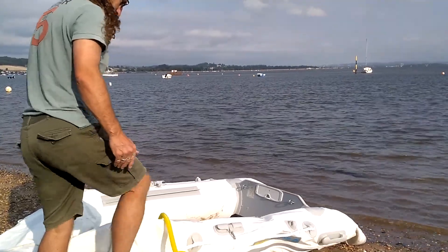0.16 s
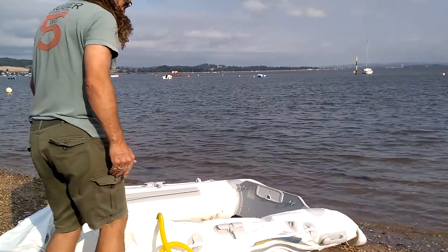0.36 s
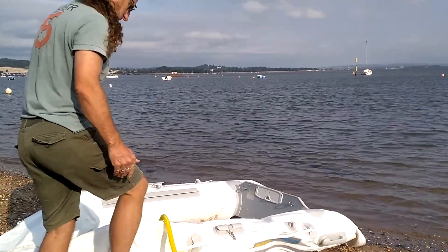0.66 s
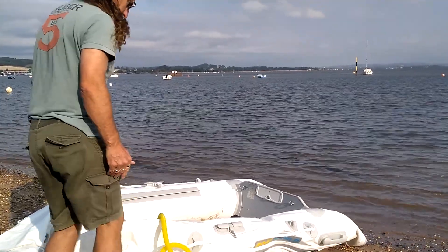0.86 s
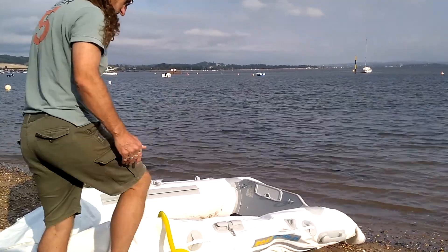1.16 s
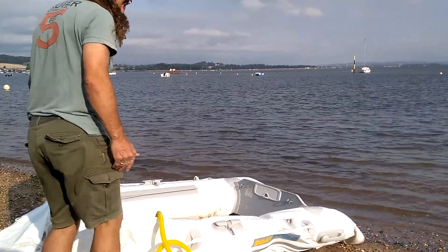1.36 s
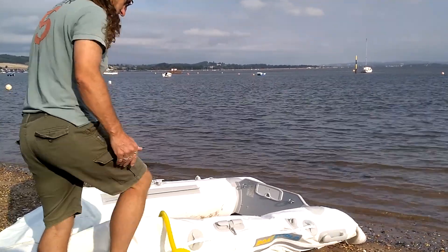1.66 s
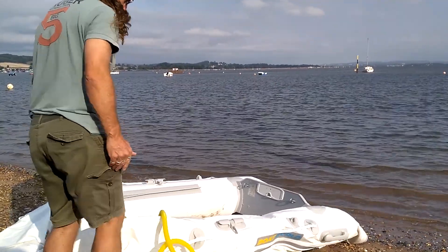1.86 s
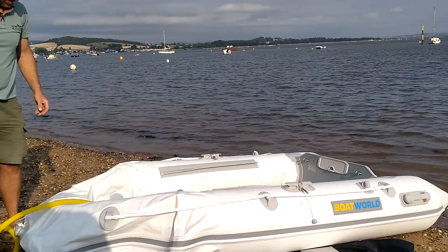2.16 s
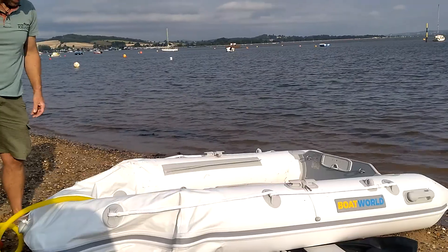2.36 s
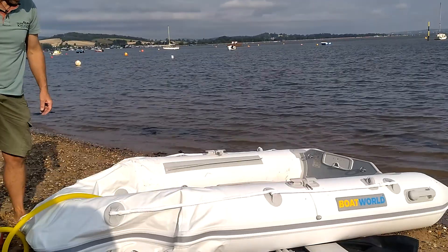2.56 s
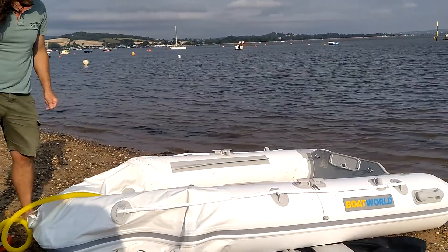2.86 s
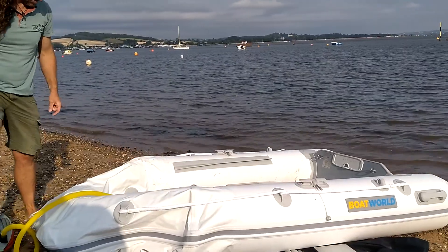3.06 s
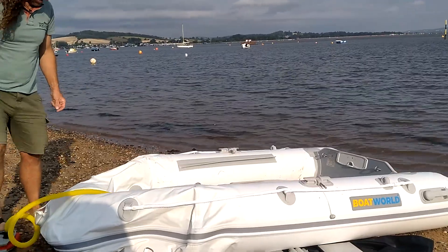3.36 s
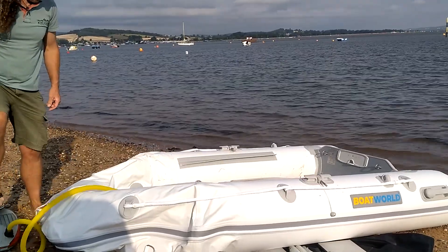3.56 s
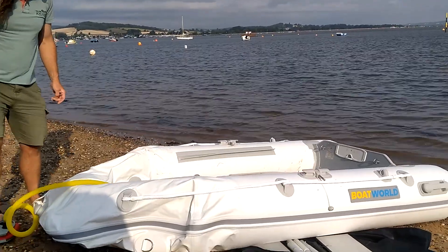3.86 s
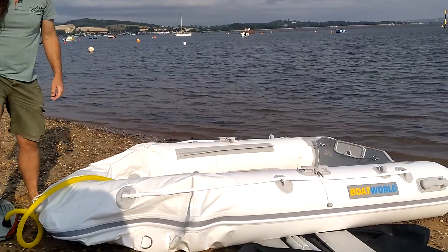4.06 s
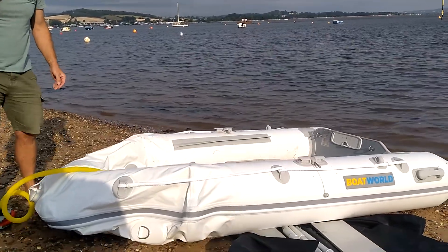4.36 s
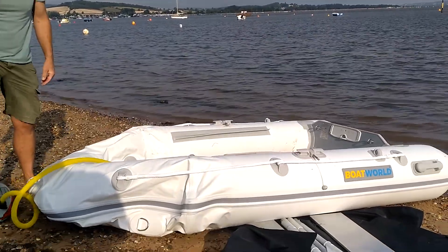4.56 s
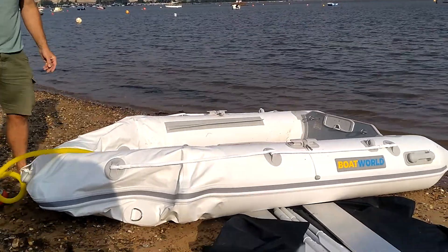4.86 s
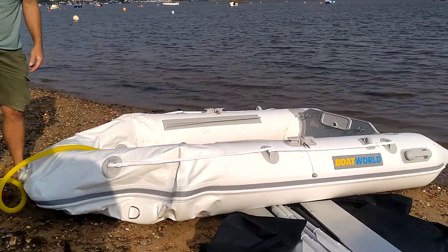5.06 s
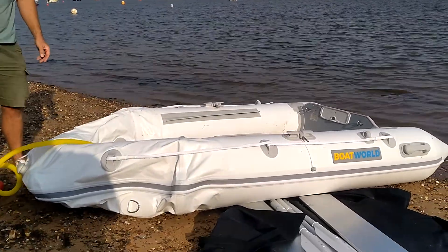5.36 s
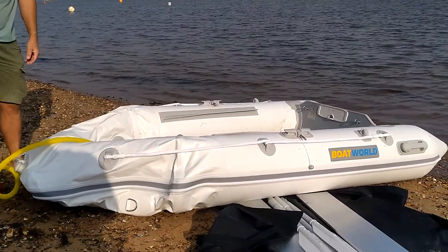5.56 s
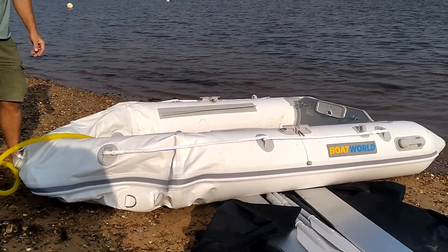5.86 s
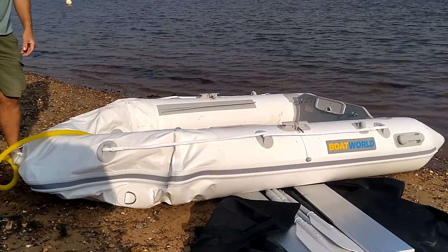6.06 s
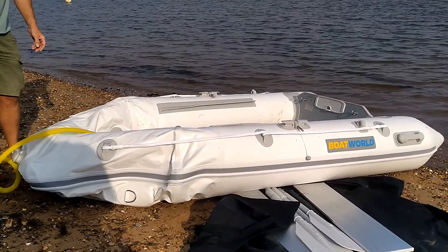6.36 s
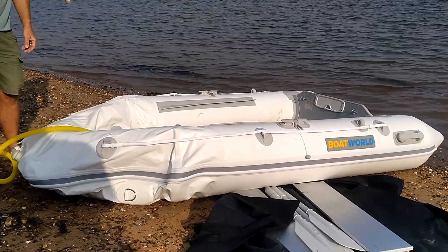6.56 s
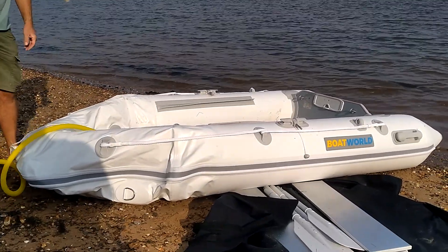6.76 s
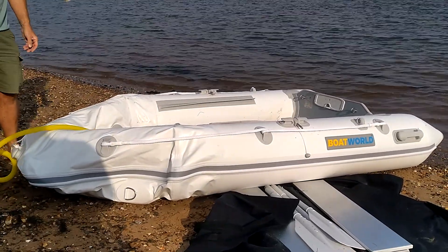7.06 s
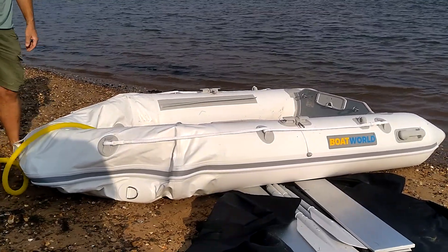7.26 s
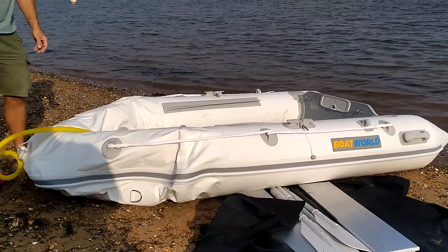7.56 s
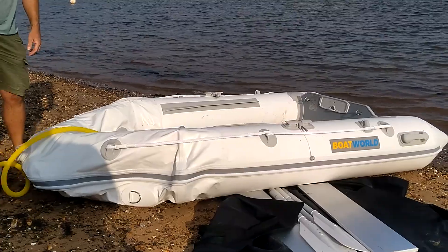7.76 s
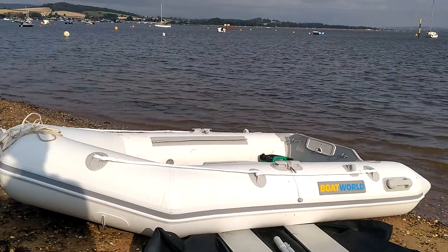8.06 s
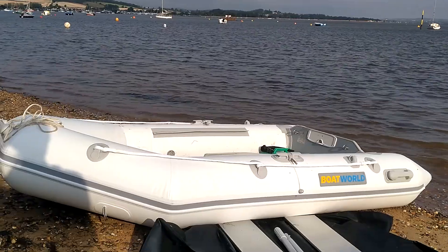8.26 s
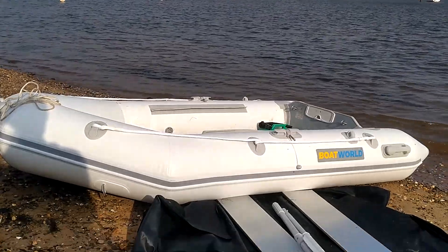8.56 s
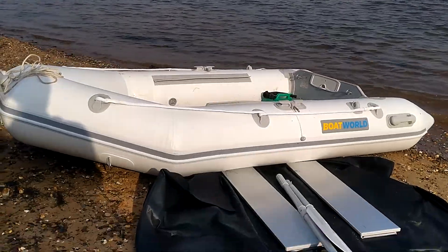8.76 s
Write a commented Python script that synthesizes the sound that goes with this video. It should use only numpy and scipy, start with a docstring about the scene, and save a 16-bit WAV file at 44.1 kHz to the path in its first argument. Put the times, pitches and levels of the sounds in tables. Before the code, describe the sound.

Outdoors on shingle, a foot pump works at two strokes a second: valve tick, rush of air, sliding squeaky whistle, soft refill. Wind buffets the stereo microphone heavily. After two seconds comes a short silence, then closer, brighter pumping with less buffeting. Another silence leads to quiet wind, soft waves, crunching pebbles and a small drip.

```python
"""A shingle beach, heard from three places in turn with silence between: at the first two a bellows foot pump
fills an inflatable boat, at the third only wind, small waves, crunching pebbles and a drip are heard.
Each stroke: the valve flaps tick (short noise and a thump), air hisses down a ribbed hose (echoing noise),
the hose whistles as the flow slows (sliding narrow noise and swelling sines), the bellows refill (duller noise).
Wind buffets both microphone ports (low noise in lumps and bursts); waves wash softly behind (patchy noise)."""
import sys
import numpy as np
from scipy import signal
from scipy.fft import rfft, irfft
from scipy.io import wavfile
from scipy.ndimage import uniform_filter1d

SR = 44100
rng = np.random.default_rng(int(sys.argv[2]) if len(sys.argv) > 2 else 0)


def put_to_file(sound):
    """Save the sound as 16-bit audio at rate SR, in the file named by the first command-line argument."""
    columns = np.atleast_2d(sound).T  # one column per channel
    safe = np.clip(columns, -1, 1)
    whole_steps = np.round(safe * 32767)
    wavfile.write(sys.argv[1], SR, whole_steps.astype(np.int16))


def undo_db(level):
    """Turn decibels back into plain size, where 20 dB means ten times bigger."""
    steps = np.asarray(level, float) / 20
    return 10 ** steps


N = 393606

# the three listening places: cut in t/s, fade-in length/s, cut out t/s
PLACES = [(-1, .01, 2.127), (2.468, .2, 7.847), (8.19, .2, 9)]
# pump strokes: foot down t/s, push hiss level/dB, refill hiss level/dB, first valve flap before t/s, flap click level/dB
STROKES = [(-.335, -33, -44, .013, -36), (.1795, -33, -44, .0135, -35), (.6754, -34, -44, .016, -38),
           (1.1837, -34.5, -45, .0135, -39), (1.689, -33.5, -44, .013, -40),
           (2.5975, -30.5, -42, .009, -31), (3.1218, -30.5, -43, .0105, -30),
           (3.6436, -30.5, -43, .0115, -24), (4.154, -30, -42, .013, -30), (4.685, -30, -43, .011, -24),
           (5.213, -30, -42, .012, -26), (5.7374, -30, -42, .018, -27), (6.272, -29.5, -42, .0135, -25),
           (6.8014, -29, -43, .012, -30), (7.336, -29.5, -48, .01, -28)]
PUSH_S = .306   # nominal length of a push
HOSE_SPACING_HZ = 101.8   # spacing of the hose modes


def rms_one(x):
    """Scales a signal to an rms of 1."""
    return x / np.sqrt(np.mean(x ** 2) + 1e-20)


def in_time(rows):
    """The columns of a table, read at every sample."""
    s, *columns = np.transpose(rows)
    return [np.interp(np.arange(N) / SR, s, c) for c in columns]


def at_hz(points, column=1):
    """A table read at every FFT bin on a log-frequency axis."""
    hz = np.fft.rfftfreq(N, 1 / SR) + 1
    points = np.array(points)
    return np.interp(np.log(hz), np.log(points[:, 0]), points[:, column])


def coloured(spectrum, channels):
    """The FFT of independent noises shaped to a spectrum."""
    return rfft(rng.standard_normal((channels, N))) * undo_db(at_hz(spectrum))


def drift(rate, channels=1):
    """Slow chance through a double one-pole low-pass at rate Hz, made at SR / 8; spread 1."""
    r = np.exp(-16 * np.pi * rate / SR)
    chance = rng.standard_normal((channels, N // 8 + 4001))
    slow = signal.lfilter([1], [1, -2 * r, r * r], chance)[:, 4000:]
    return np.repeat(rms_one(slow), 8, axis=1)[:, :N]


def ring(clicks, hz, t60):
    """A two-pole resonance struck by clicks, falling 60 dB in t60 seconds."""
    r, w = undo_db(-60 / (t60 * SR)), 2 * np.pi * hz / SR
    return signal.lfilter([0, np.sin(w)], [1, -2 * r * np.cos(w), r * r], clicks + 1e-18)


def dying_bursts(when, db, t60):
    """An envelope that jumps up at each time and falls 60 dB in t60 seconds."""
    starts = np.zeros(N)
    starts[(np.asarray(when) * SR).astype(int)] = undo_db(db)
    return signal.lfilter([1], [1, -undo_db(-60 / (t60 * SR))], starts + 1e-18)


def panned(db, pan_db):
    """Gains of the left and right port, pan_db apart."""
    return undo_db(db + pan_db * np.array([[.5], [-.5]]))


def wind():
    """Each port has its own eddies: a lumpy rumble, and buffets in bursts that get brighter as they get stronger."""
    # wind at the ports: t/s, rumble level/dB, buffet level/dB, buffet left-right level/dB
    wind_levels = [(0, -15.5, -22.5, 6), (1.25, -13.5, -20, 6), (1.75, -15.5, -23.5, 5),
                   (2.12, -15, -17.5, 4), (2.6, -19.5, -35.6, 8), (3.05, -27.5, -42.6, 1),
                   (3.3, -23.5, -43, -1), (3.8, -23.5, -40.6, -2), (4.6, -20, -39, -5), (5.1, -12, -30, -4),
                   (5.7, -14.5, -31, -7), (6.15, -21.5, -40.6, -3), (6.7, -14.5, -36.6, -4),
                   (7.15, -14.5, -30.6, -4), (7.45, -19.5, -40.6, -5), (7.7, -10, -34.6, -9),
                   (8.3, -32, -55.6, -2), (8.65, -20.5, -49.6, -14), (8.92, -31.5, -56.6, -6)]
    # colour of the rumble: f/Hz, level per Hz/dB
    rumble_colour = [(8, -20), (18, -1), (45, 0), (110, -8), (200, -15), (370, -31), (700, -50),
                     (1400, -75)]
    # colour of the buffets: f/Hz, level per Hz/dB
    buffet_colour = [(100, -8), (230, 0), (450, -8), (800, -23), (1600, -46), (3000, -70)]
    rumble_lean = .6   # share of the buffets' left-right lean that the rumble follows
    rumble_db, buffet_db, buffet_pan = in_time(wind_levels)
    lumps = 4.0 * drift(9, channels=2)
    rumble = rms_one(irfft(coloured(rumble_colour, channels=2), N) * undo_db(lumps))

    buffet = irfft(coloured(buffet_colour, channels=2), N)
    bursts = .8 * lumps + 4.0 * drift(18, channels=2) + 4.5 * drift(70, channels=2)
    buffet = rms_one(buffet * undo_db(bursts))
    dull = signal.sosfiltfilt(signal.butter(2, 380, fs=SR, output="sos"), buffet)
    # the part above 380 Hz grows faster than the level, most at the stronger port
    edge = undo_db(.35 * (buffet_db + 22.6) + buffet_pan * np.array([[.6], [-.6]]))
    buffet = dull + edge * (buffet - dull)
    return panned(rumble_db, rumble_lean * buffet_pan) * rumble + panned(buffet_db, buffet_pan) * buffet


def shore():
    """Small waves wash in grainy patches; pebbles crunch in short bright bursts; a drop plops."""
    # colour of the wash: f/Hz, level per Hz/dB
    wash_colour = [(300, -24), (650, -4), (1300, -6), (2400, 0), (4500, -10), (6000, -18), (9000, -22),
                   (15400, -58)]
    # shingle shifting: t/s, burst level before the band-pass/dB
    crunches = [(8.2482, -57), (8.3, -57), (8.4944, -56), (8.5944, -52), (8.6981, -36), (8.7114, -45),
                (8.8338, -49)]
    wash_db = -52.3   # before the patches
    drip_s, drip_hz, drip_db = 8.885, 690, -45
    patches = 1.5 * drift(5, channels=2) + 1.8 * drift(70, channels=2)
    wash = undo_db(wash_db + patches) * rms_one(irfft(coloured(wash_colour, channels=2), N))

    s, db = np.transpose(crunches)
    band = signal.butter(2, [2800, 9500], "band", fs=SR, output="sos")
    grit = signal.sosfilt(band, rng.standard_normal((2, N)))
    crunch = dying_bursts(s, db, t60=.045) * grit

    drop = undo_db(drip_db) * (np.arange(N) == round(drip_s * SR))
    return wash + crunch + ring(drop, drip_hz, t60=.07)


def hiss(spectrum):
    """Jet noise echoing in the hose, part of it common to both ports, coloured by the place."""
    # colour of the pump at each port, one table for the first place and one for the second:
    # f/Hz, left level/dB, right level/dB
    port_colours = [
        [(1200, -3, -4), (1700, -7, -5), (2700, -11, -5), (4300, -3, 3), (6000, -6, -5), (7200, 2, 0),
         (12000, -2, -2)],
        [(1100, -3, -4), (1600, -6, -8), (2400, 1, -2), (3400, 3, 2), (5000, -3, -2), (6100, -4, 2),
         (7700, 4, -4), (9500, -8, 4), (14000, -8, -1)],
    ]
    # the left port hears the pump later, directly and off the shingle, a row for each place:
    # direct lag t/ms, bounce lag t/ms, bounce share
    left_lags = [(.05, 1.07, .8), (.16, .77, .9)]
    # likeness of the two ports: f/Hz, share of power common to both
    likeness = [(1000, .6), (3000, .7), (6000, .5), (9000, .15)]
    hose_echo = .3   # share of the sound that returns after each trip
    hz = np.fft.rfftfreq(N, 1 / SR)
    hose = 1 / (1 + hose_echo * np.exp(-2j * np.pi * hz / HOSE_SPACING_HZ))
    common, left, right = coloured(spectrum, channels=3) * hose
    alike = np.clip(at_hz(likeness), 0, 1)
    at_places = []
    for colour, (direct_ms, bounce_ms, share) in zip(port_colours, left_lags):
        direct = np.exp(-2j * np.pi * hz * direct_ms / 1000)
        bounce = share * np.exp(-2j * np.pi * hz * bounce_ms / 1000)
        late = (direct + bounce) / np.hypot(1, share)
        both = np.sqrt(alike) * np.array([common * late, common])
        both = both + np.sqrt(1 - alike) * np.array([left, right])
        port_db = np.array([at_hz(colour, column=1), at_hz(colour, column=2)])
        at_places.append(both * undo_db(port_db))
    first, second = at_places
    # level reference: the ports' mean at the second place, 4.5 to 11 kHz
    treble = irfft(second.mean(0) * (hz > 4500) * (hz < 11000), N)
    scale = np.sqrt(np.mean(treble ** 2))
    in_first = np.arange(N) < PLACES[1][0] * SR
    return np.where(in_first, irfft(first, N), irfft(second, N)) / scale


def per_stroke(shape, column, refill=False):
    """A shape laid on every stroke at that stroke's level."""
    t, shape = np.arange(N) / SR, np.array(shape)
    when, db = shape[:, 0], shape[:, column]
    when = PUSH_S + when if refill else PUSH_S * when
    out = np.zeros(N)
    for s, push_db, refill_db, *_ in STROKES:
        at = slice(*np.searchsorted(t, s + when[[0, -1]]))
        stroke_db = refill_db if refill else push_db
        out[at] += undo_db(stroke_db + np.interp(t[at] - s, when, db))
    return out


def pump_air():
    """Push and refill differ in colour and shape; turbulence makes both flutter."""
    # colour of the push: f/Hz, level per Hz/dB
    push_colour = [(410, -52), (700, -22), (757, -26), (818, -20), (1070, -14), (1450, -13), (1690, -8),
                   (2100, -11), (2590, 0), (3530, -7), (5010, -7), (6080, -15), (9500, -12.5), (11000, -24),
                   (13900, -38), (15400, -48)]
    # colour of the refill: f/Hz, level per Hz/dB
    refill_colour = [(410, -50), (700, -20), (931, -6), (1370, -14), (1520, -5), (1900, -18), (2590, 1),
                     (2830, -7), (3100, -2), (4340, -13), (5210, -12), (9320, -20), (15400, -47)]
    # shape of a push; the treble dies as the flow slows while the hose body still sounds:
    # t/share of push length, body level/dB, treble level/dB
    push_shape = [(0, -45, -45), (.07, -26, -30), (.2, -9, -13), (.36, -2, -3), (.5, 0, 0), (.66, 0, -1),
                  (.87, -2.5, -12), (.97, -13, -21), (1.1, -26, -30), (1.3, -60, -60)]
    # shape of a refill: t after the push/s, level/dB
    refill_shape = [(-.05, -40), (0, -11), (.025, 0), (.045, 0), (.09, -6), (.16, -11), (.21, -19),
                    (.26, -40)]
    body_top_hz = 3700
    push = hiss(push_colour)
    body = signal.sosfiltfilt(signal.butter(2, body_top_hz, fs=SR, output="sos"), push)
    treble = push - body
    air = body * per_stroke(push_shape, column=1) + treble * per_stroke(push_shape, column=2)
    air += hiss(refill_colour) * per_stroke(refill_shape, column=1, refill=True)
    return air * undo_db(1.2 * drift(40) + 1.1 * drift(300))


def gusts():
    """Sharp eddies breaking on the left port, each a short lumpy burst of low noise, weaker on the right."""
    # eddies: t/s, left burst level before the band-pass/dB
    eddies = [(0.06, -6), (0.359, 3), (0.572, -1), (0.64, 2), (0.707, 1), (0.743, 3), (0.955, 6),
              (1.003, 6), (1.183, 4), (1.267, -1), (1.715, 3), (1.773, 6), (1.82, 6), (1.882, 3),
              (2.572, -12)]
    right_db = -12.5   # gain of the right port
    s, db = np.transpose(eddies)
    dying = dying_bursts(s, db, t60=.1) * undo_db(3.0 * drift(90)[0])
    band = signal.butter(3, [170, 700], "band", fs=SR, output="sos")
    eddy = signal.sosfilt(band, rng.standard_normal((2, N)) * dying)
    return eddy * [[1], [undo_db(right_db)]]


def flaps():
    """A dull flap, then a bright one: each a dry scuff of a few ms, and a thump in the bellows."""
    # colour of the two valve flaps: f/Hz, dull flap level/dB, bright flap level/dB
    flap_colour = [(700, -14, -14), (1600, -4, -6), (3000, 0, -3), (4300, -10, -6), (5600, -16, 4),
                   (7000, -24, -7), (11000, -34, -9), (15000, -50, -25)]
    thump_hz, thump_gain_db, thump_t60_s = 270, -15, .022
    s, *_, lead, db = np.transpose(STROKES[1:])
    out = np.zeros((2, N))
    for column, when in [(1, s - lead), (2, s)]:
        starts = np.zeros(N)
        starts[(when * SR).astype(int)] = undo_db(rng.normal(0, 3.0, len(when)))
        blow = uniform_filter1d(starts + .7 * np.roll(starts, 900), size=40)   # a soft blow and its rebound
        out += undo_db(thump_gain_db) * ring(blow, thump_hz, thump_t60_s)
        scuff = dying_bursts(when, db, t60=.014) * rng.standard_normal((2, N))
        out += irfft(rfft(scuff) * undo_db(at_hz(flap_colour, column)), N)
    return out


def hose_side(t):
    """The hose lies to the right in the first place, a little left in the second (L-R dB)."""
    return np.where(t < PLACES[1][0], -10., 3.)


def rib_tone():
    """Narrow noise on the sliding pitch, fed through the hose's echo so that the modes it passes ring."""
    # the ribs' breathy tone slides down as the push ends: t/share of push length, f/Hz, level re push hiss/dB
    slide = [(.55, 3750, -30), (.7, 3520, -3), (.8, 3300, 2), (.9, 3000, 0), (1.0, 2800, -14),
             (1.1, 2700, -40)]
    width_hz, ring_share = 260, .8   # ring_share: what returns after each trip along the hose
    t = np.arange(N) / SR
    share, hz, _ = np.transpose(slide)
    when = np.ravel([s + share * PUSH_S for s, *_ in STROKES])
    pitch = np.interp(t, when, np.tile(hz, len(STROKES)))
    real, imag = drift(width_hz / 2, channels=4).reshape(2, 2, N)
    carrier = np.exp(2j * np.pi * np.cumsum(pitch) / SR)
    breath = np.real((real + 1j * imag) * carrier) * per_stroke(slide, column=2)
    echo = 1 + ring_share * np.exp(-2j * np.pi * np.fft.rfftfreq(N, 1 / SR) / HOSE_SPACING_HZ)
    ringing = irfft(rfft(breath) / echo, N) * np.sqrt(1 - ring_share ** 2)
    return ringing * panned(0, hose_side(t))


def whistles():
    """Each mode swells as the ribs' tone sweeps down past it, wavers, then rings out."""
    # each whistle speaks on the loud mode, then hops to a lower one:
    # loud peak t/s, loud peak level/dB, lower mode f/Hz, lower peak level/dB
    hops = [(.407, -18, 2998, -24), (.908, -16, 3095, -25), (1.413, -23, 2895, -28),
            (1.926, -17, 3308, -21), (2.832, -18, 3095, -22), (3.368, -21, 3308, -19),
            (3.883, -23, 3200, -24), (4.394, -18, 2998, -16), (4.927, -19, 3200, -19),
            (5.474, -18, 3308, -21), (5.97, -22, 3095, -18), (6.519, -25, 3308, -14),
            (7.06, -21, 3200, -26), (7.583, -21, 2998, -20)]
    # other hose modes, brushed in passing with a strength left to chance: f/Hz, mean peak level/dB
    brushed = [(3513, -27), (3203, -31), (3095, -32), (2998, -30)]
    brushed_spread_db = 2.5
    loud_mode_hz, sweep_hz_per_s, swell_s = 3412, 18000, .032
    out, waver = np.zeros((2, N)), drift(25, channels=2)
    draws = rng.random((len(hops), 2 + len(brushed), 5))
    for (peak_s, loud_db, lower_hz, lower_db), chances in zip(hops, draws):
        modes = [(loud_mode_hz, loud_db), (lower_hz, lower_db)]
        for (hz, db), strength in zip(brushed, chances[2:, 4]):
            modes.append((hz, db + brushed_spread_db * (4 * strength - 2)))
        for (hz, db), chance in zip(modes, chances):
            s = peak_s + (loud_mode_hz - hz) / sweep_hz_per_s   # when the sweep passes this mode
            length = swell_s * (.75 + .5 * chance[3])
            at = slice(round((s - .1) * SR), round((s + .2) * SR))
            t = np.arange(N)[at] / SR - s
            rise = np.exp(-(t / (.6 * length)) ** 2)
            fall = .6 / np.cosh(t / (.45 * length)) + .4 * np.exp(-(t / .058) ** 2)
            swell = np.where(t < 0, rise, fall)
            # each port has its own starting phase
            phase = 2 * np.pi * (hz * t + chance[:2, None]) + .62 * waver[0, at]
            side = hose_side(s) + 8 * (chance[2] - .5)
            out[:, at] += panned(db + 3.0 * waver[1, at], side) * swell * np.sin(phase)
    return out


def scene():
    """All sources reach the two ports."""
    return pump_air() + rib_tone() + whistles() + flaps() + wind() + gusts() + shore()


def roll_off(x):
    """The treble ends steeply here."""
    return signal.sosfilt(signal.butter(12, 15590, fs=SR, output="sos"), x)


def record(dry):
    """Peaks overload softly; each place is cut off within a few ms and the next fades in."""
    t = np.arange(N) / SR
    fader = np.zeros(N)
    for start, fade, end in PLACES:
        fader += np.clip((t - start) / fade, 0, 1) * np.clip((end - t) / .004, 0, 1)
    mix = 1.05 * np.tanh(dry / 1.05) * fader
    return roll_off(mix)


dry = scene()
out = record(dry)
put_to_file(out)
```